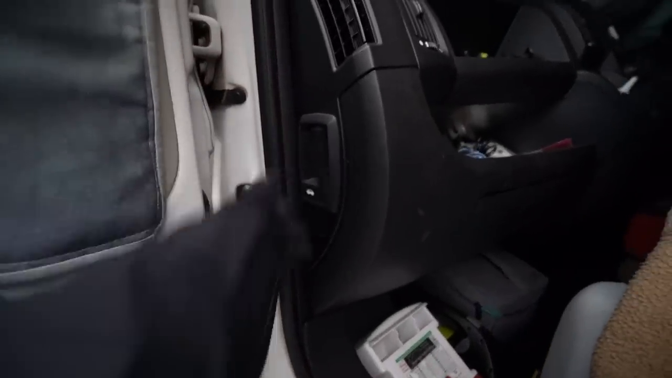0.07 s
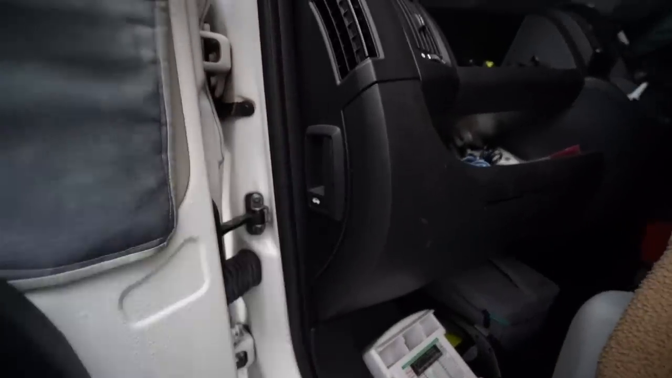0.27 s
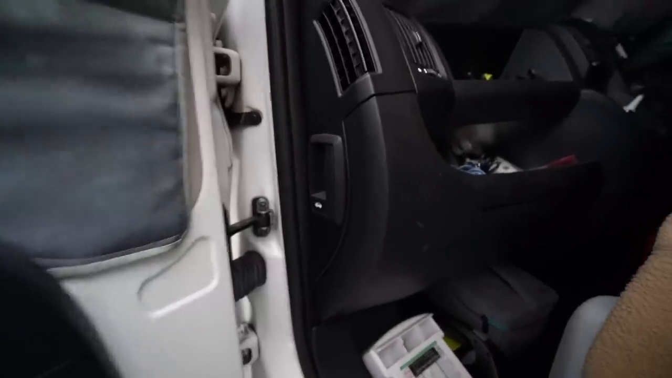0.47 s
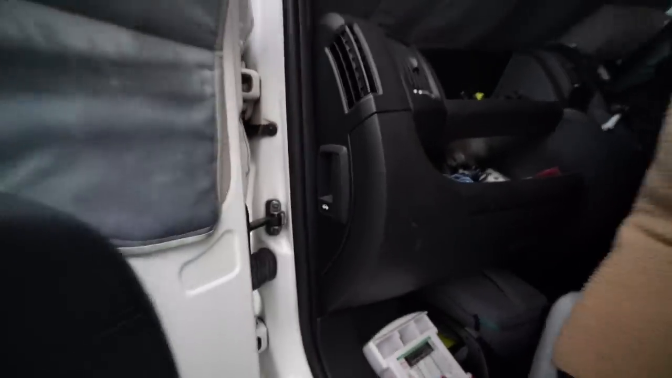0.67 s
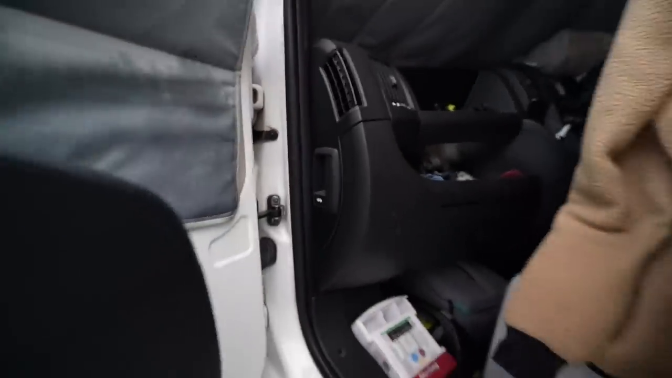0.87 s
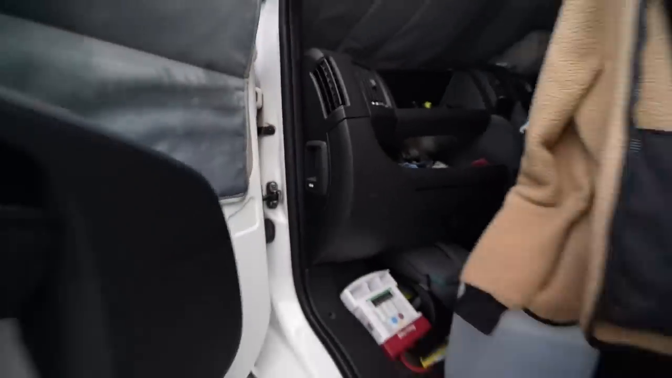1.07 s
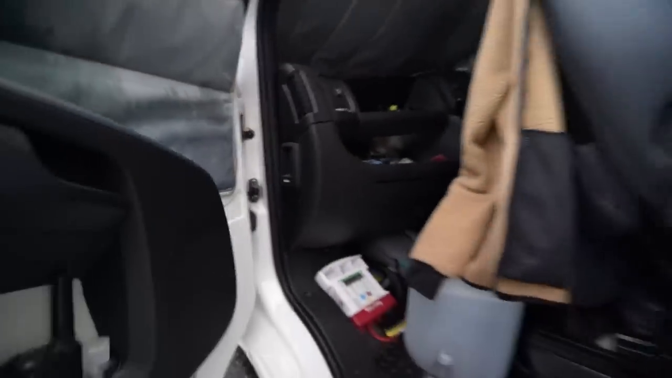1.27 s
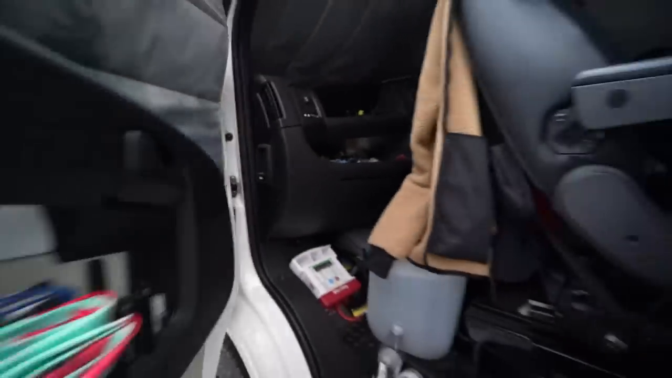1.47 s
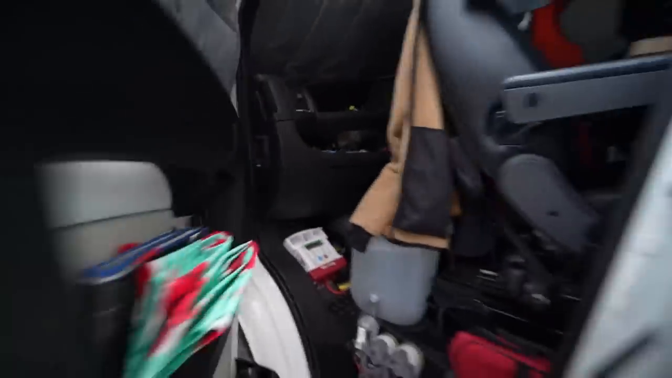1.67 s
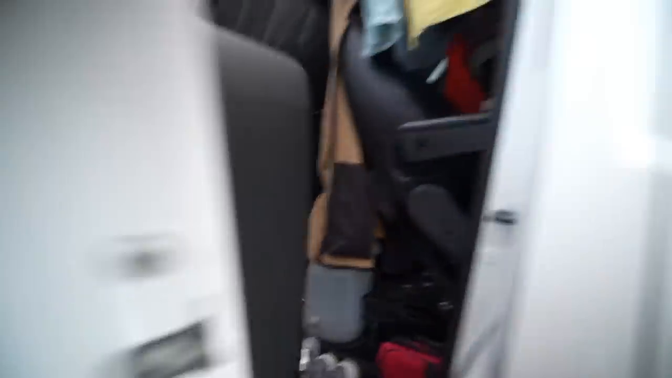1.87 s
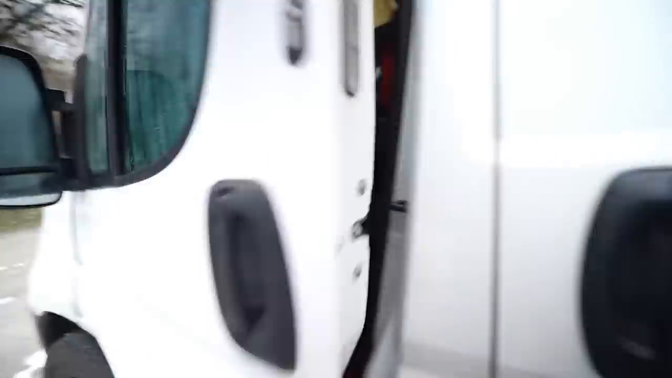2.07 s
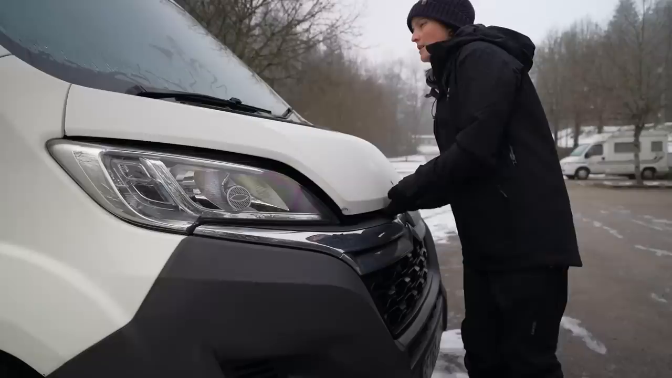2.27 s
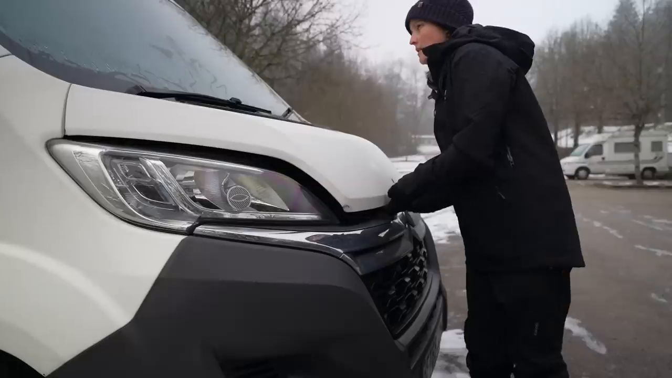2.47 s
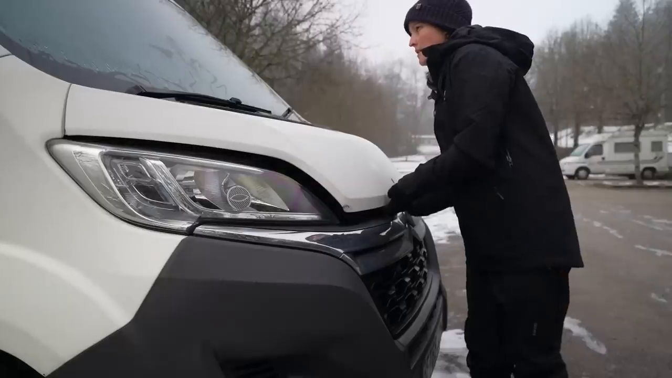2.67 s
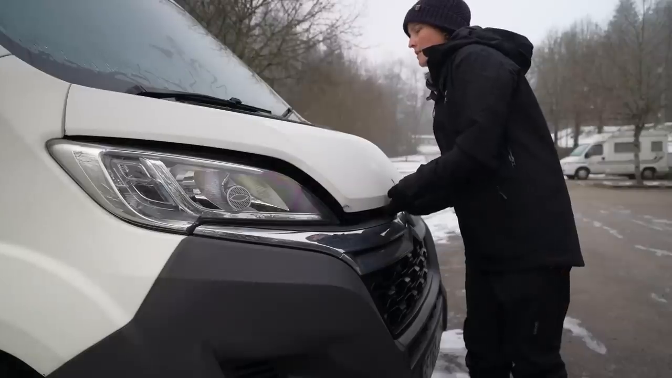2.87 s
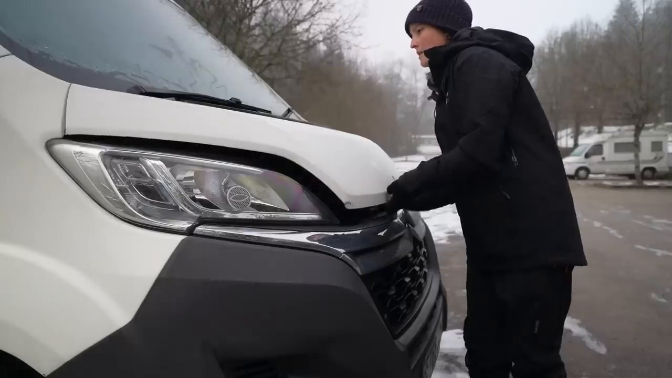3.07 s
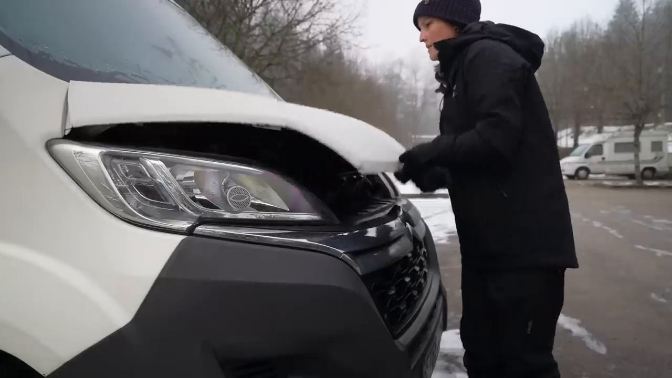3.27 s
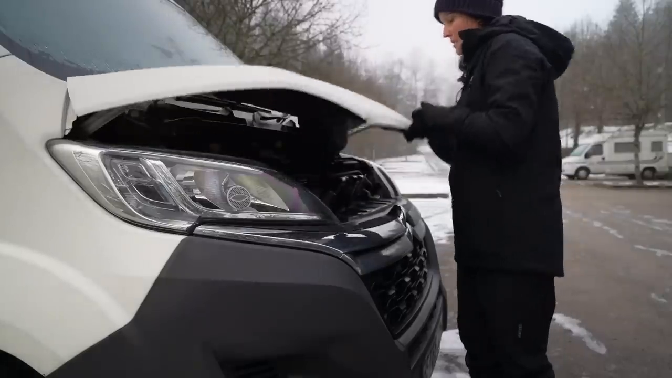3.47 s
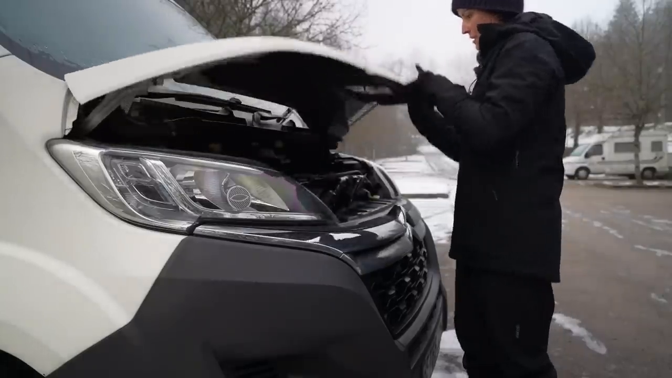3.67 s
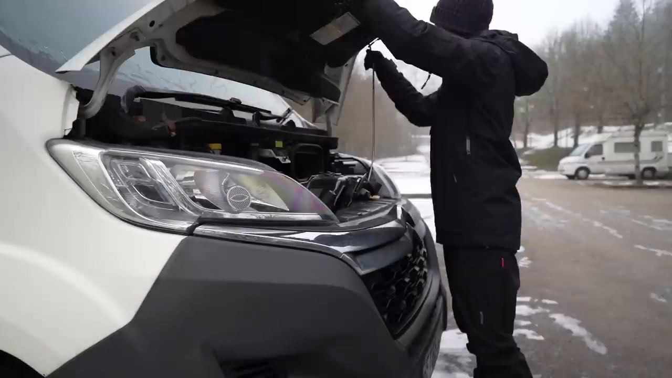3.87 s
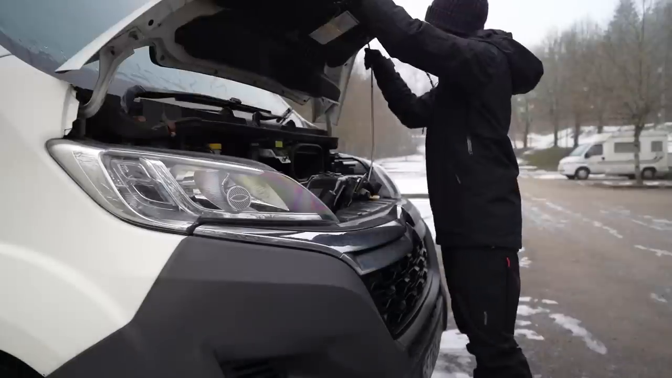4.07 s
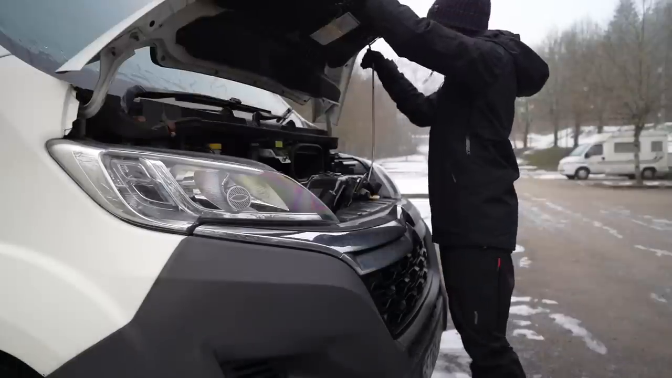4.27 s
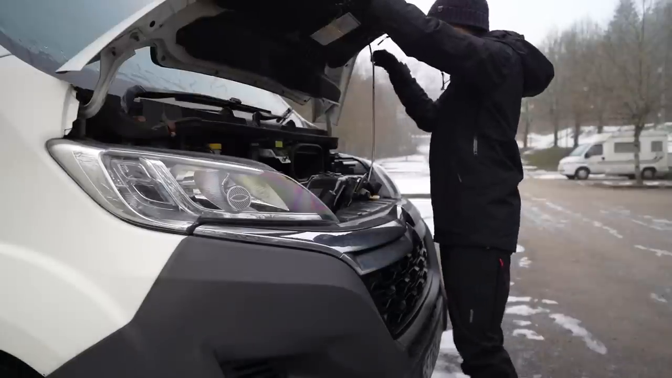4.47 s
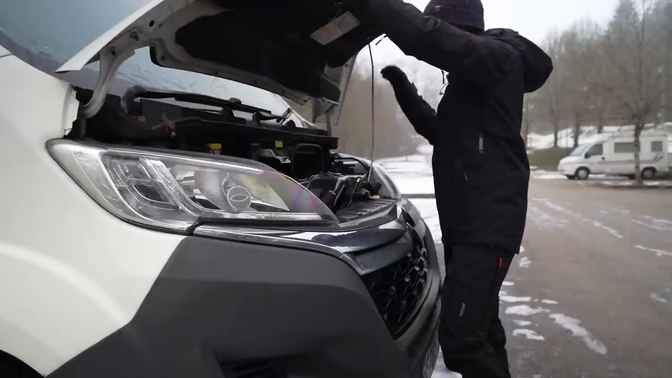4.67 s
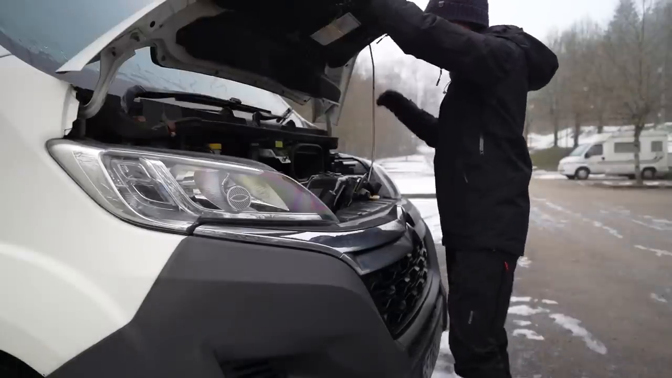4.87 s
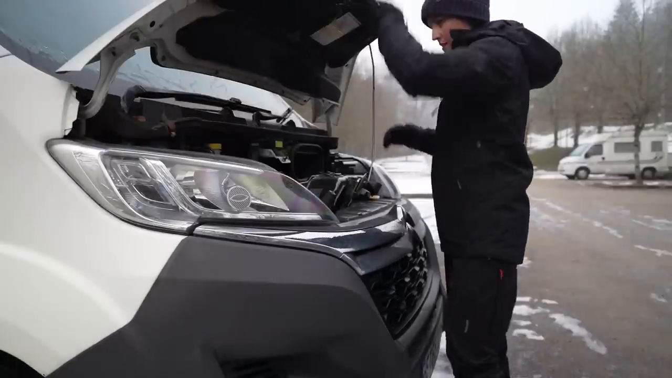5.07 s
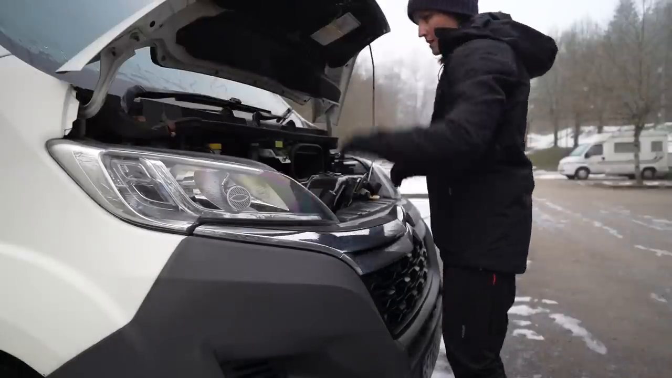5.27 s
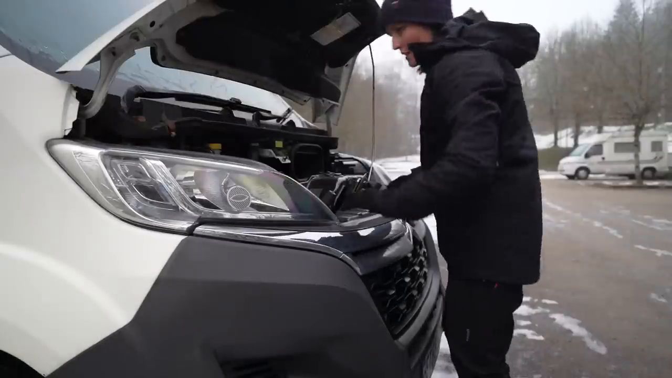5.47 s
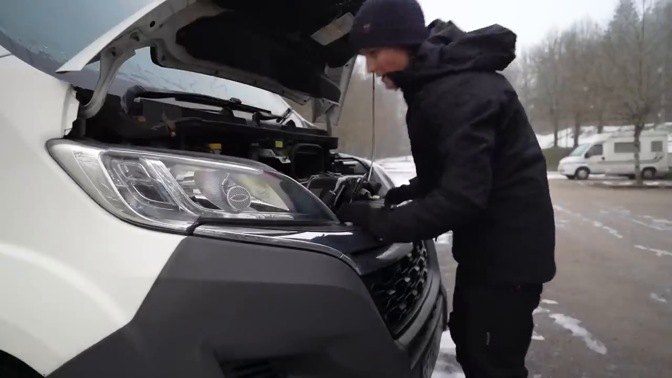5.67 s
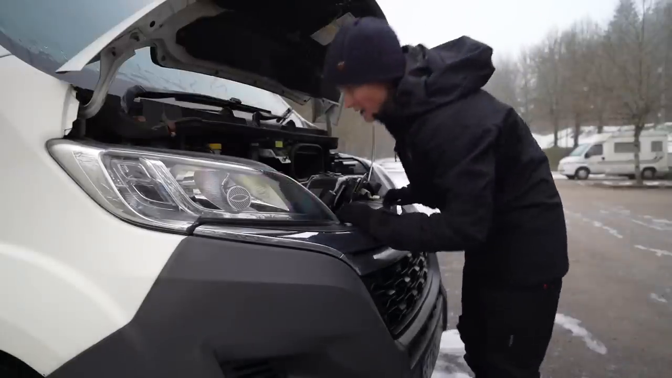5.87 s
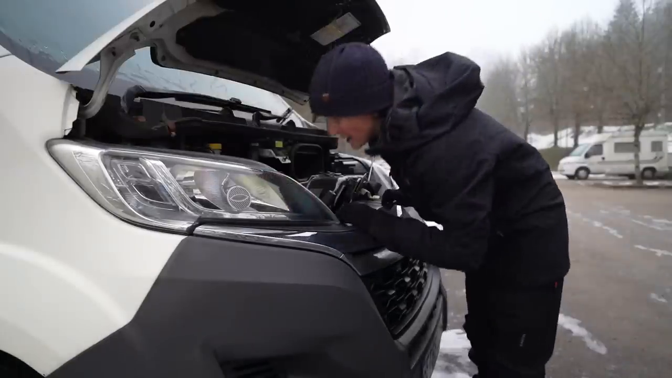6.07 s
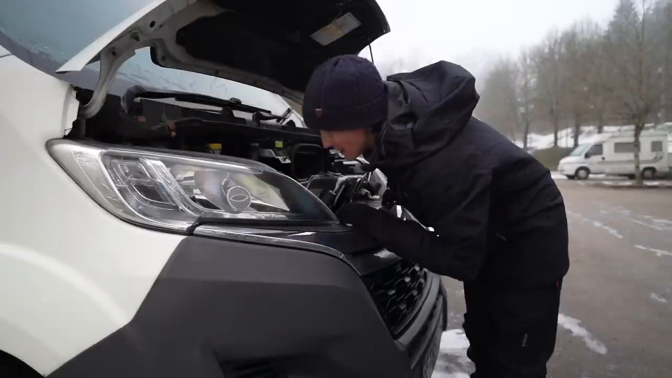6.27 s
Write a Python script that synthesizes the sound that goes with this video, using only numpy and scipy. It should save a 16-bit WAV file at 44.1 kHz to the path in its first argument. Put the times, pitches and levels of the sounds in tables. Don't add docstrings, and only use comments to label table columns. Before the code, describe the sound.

Outdoors by a van, close and hand-held at first, with low wind and grip rumble. At 0.1 s a sprung plastic lever snaps sharply, hits its stop and bounces within 0.05 s. A jacket sleeve whips past at 0.2-0.3, then trim scrapes and a knock at 0.39, gear sliding and bumping from 0.55 to 0.75. Soft low thumps and small ticks continue from 0.9 to 2.1. At 2.22-2.36 the heavy cab door slams, the loudest event, several dense dry impacts with a brief wash and loose rattles until 2.65. Steady quiet air with distant traffic follows. A steel catch clicks at 2.88; slips lead to a bright hollow bonnet clunk at 3.21, ringing sheet metal. Light cloth movement, then a prop rod knocks home at 4.06 and rings. Faint bird whistles at 4.44, 4.63 and 6.07. From 4.95 to 6.3, soft dull finger taps and tiny clicks in the engine bay, strongest around 5.02 and 5.74.

```python
import sys
import numpy as np
from scipy import signal
from scipy.fft import rfft, irfft
from scipy.io import wavfile

SR = 44100
rng = np.random.default_rng(int(sys.argv[2]) if len(sys.argv) > 2 else 0)


def bounce(signal):
    frames = np.transpose(np.atleast_2d(signal))
    limited = np.clip(frames, -1, 1)
    pcm = np.round(limited * 32767).astype(np.int16)
    wavfile.write(sys.argv[1], SR, pcm)


def gain_from_db(level_db):
    decades = np.asarray(level_db, float) / 20
    return 10 ** decades


N = 278267
EDGES_HZ = 24 * 2 ** np.arange(0, 9.6, 1 / 2)
CENTRES_HZ = np.sqrt(EDGES_HZ[1:] * EDGES_HZ[:-1])


def rms_one(x):
    return x / np.sqrt(np.mean(x ** 2, axis=-1, keepdims=True) + 1e-20)


def at_hz(points, hz):
    table_hz, value = np.transpose(points)
    return np.interp(np.log(hz), np.log(table_hz), value)


def band_pass(x, low_hz, high_hz):
    return signal.sosfilt(signal.butter(2, [low_hz, high_hz], "band", fs=SR, output="sos"), x)


def drift(rate_hz, count):
    r = np.exp(-2 * np.pi * rate_hz * 64 / SR)
    white = rng.standard_normal((count, N // 64 + 1002))
    slow = signal.lfilter([1], [1, -2 * r, r * r], white)[:, 1000:]
    return np.repeat(rms_one(slow), 64, axis=1)[:, :N]


def noise_bank():
    white = rng.standard_normal((2, N + SR))
    bands = zip(EDGES_HZ, EDGES_HZ[1:])
    return np.array([band_pass(white[k % 2], low, high) for k, (low, high) in enumerate(bands)])


def crackle(per_s, spread_db, clump_hz):
    sizes = gain_from_db(spread_db * np.minimum(rng.exponential(1, N), 5)) * rng.choice([-1, 1], N)
    chance = per_s * gain_from_db(4 * drift(clump_hz, count=1)[0]) / SR
    return rms_one(sizes * (rng.random(N) < chance))


def strokes(rows, attack_s, release_s):
    t = np.arange(0, N + 16, 16) / SR
    gain = 0
    for s, length_s, db, fall_db in rows:
        corners_s = [s - attack_s, s, s + length_s, s + length_s + release_s]
        corners_db = [db - 24.5, db, db - fall_db, db - fall_db - 34.5]
        gain = gain + gain_from_db(np.interp(t, corners_s, corners_db, -200, -200))
    return np.interp(np.arange(N) / SR, t, gain)


def blows(bank, events, modes, tone, t60s, modes_db, panel_db, crack_db, rise_cycles, contact_s):
    out, t = np.zeros(N + SR), np.arange(SR // 3) / SR
    hz, mode_db, mode_t60 = (c[:, None] for c in np.transpose(modes))
    signs = (-1) ** np.arange(len(modes))
    band_gain = gain_from_db(at_hz(tone, CENTRES_HZ))
    band_gain = band_gain / np.sqrt(np.sum(band_gain ** 2 * np.diff(EDGES_HZ)) / (SR / 2))
    press = 1 - np.exp(-t / max(contact_s, 1e-4))
    swell = 1 - np.exp(-t * CENTRES_HZ[:, None] / max(rise_cycles, .05))
    sines, band_t60 = np.sin(2 * np.pi * hz * t), at_hz(t60s, CENTRES_HZ)[:, None]
    longest_s = max(band_t60.max(), mode_t60.max())
    luck = rng.standard_normal((len(events), len(modes), 1))
    for (s, peak_db, bass_db, treble_db, length), strength in zip(events, luck):
        tilt = [(250, bass_db), (900, 0.0091), (4000, treble_db)]
        at, length = round(s * SR), np.clip(length, .2, 3)
        n = min(len(t), int(2 * length * longest_s * SR))
        fall = np.log(1000) * t[:n] / length
        dying = np.exp(-fall / band_t60) + gain_from_db(-24.5) * np.exp(-0.31 * fall / band_t60)
        noise = bank[:, at:at + n]
        panel = (band_gain * gain_from_db(at_hz(tilt, CENTRES_HZ))) @ (swell[:, :n] * dying * noise)
        rings = gain_from_db(mode_db + at_hz(tilt, hz) + 1.1 * strength) * np.exp(-fall / mode_t60) * sines[:, :n]
        crack = gain_from_db(crack_db + treble_db - 60 * t[:n] / 0.0028) * np.sum(noise[-4:], axis=0)
        body = gain_from_db(panel_db) * panel + gain_from_db(modes_db) * (signs @ rings)
        out[at:at + n] += gain_from_db(peak_db) * (press[:n] * body + crack)
    low_cut = signal.butter(2, tone[1][0] * 1.3, "high", fs=SR, output="sos")
    return signal.sosfilt(low_cut, out[:N] + 1e-12)


# (frequency [Hz], density [dB/Hz])
AIR_TONE = [(22, -25), (103, 2.5), (266, 5), (980, 0), (2670, -8), (4360, -27.5), (14000, -29.5),
            (16500, -46.5)]
# (time [s], length [s], level [dB], fall [dB])
SLAM_WASH = [
    (2.4, 0.17, -50, 16),
]
AIR_DB, AIR_FOLLOWS = -64.5, .35


def far_air(bank, rustle):
    gains = gain_from_db(at_hz(AIR_TONE, CENTRES_HZ)[:, None] + 1.4 * drift(8, count=len(bank)))
    air = np.sum(gains * bank[:, SR:], axis=0)
    level = gain_from_db(AIR_DB) * (rustle / gain_from_db(-78.5)) ** AIR_FOLLOWS
    level = level + strokes(SLAM_WASH, attack_s=.1, release_s=0.046)
    return level * air / np.std(band_pass(air, 280, 3500))


# (time [s], frequency [Hz], level [dB])
CHIRPS = [
    (4.44, 4690, -66.5),
    (4.631, 4500, -69),
    (6.073, 6000, -69.5),
]
CHIRP_S = 0.015


def bird():
    out, t = np.zeros(N), np.arange(N) / SR
    for s, hz, db in CHIRPS:
        shape = np.exp(-((t - s - CHIRP_S / 2) / (0.43 * CHIRP_S)) ** 2)
        out += gain_from_db(db) * shape * np.sin(2 * np.pi * hz * (t - s) * (1 - 2.5 * (t - s)))
    return out


# (time [s], rumble level [dB])
GRIP = [(0, -65), (.3, -80), (.62, -81), (.7, -68), (.89, -76), (1.0, -68), (1.75, -56.5), (2.15, -65.5),
        (2.28, -46), (2.42, -62), (2.75, -73.5)]
BOOM_DB, BOOM_FOLLOWS = -56, 0.55


def hand_held():
    grip_s, grip_db = np.transpose(GRIP)
    t = np.arange(N) / SR
    rumble_db = np.interp(t, grip_s, grip_db)
    boom_db = BOOM_DB + BOOM_FOLLOWS * (rumble_db + 59.5)
    lumps = gain_from_db(4 * drift(15, count=2))
    rumble = rms_one(lumps[0] * band_pass(rng.standard_normal(N), 27, 59))
    boom = rms_one(lumps[1] * band_pass(band_pass(rng.standard_normal(N), 53, 280), 110, 320))
    return (gain_from_db(rumble_db) * rumble + gain_from_db(boom_db) * boom) * (t < grip_s[-1])


# (time [s], length [s], level [dB], fall [dB])
CLOTH = [(.06, 0.48, -50.5, 15.5), (.66, 0.18, -58, 5.5), (.94, 0.038, -63.5, -0.5), (1.1, 0.39, -80.5, -8),
         (1.55, 0.54, -77.5, 12), (2.3, 0.3, -76, -7.5), (2.8, 0.15, -84.5, 7.5), (3.15, 0.59, -68.5, 8.5),
         (4.3, 0.39, -85.5, -4.5), (4.96, 0.52, -73.5, -4), (5.5, 0.3, -75.5, 3), (5.85, 0.37, -76.5, 7)]
STILL_DB = -81.5


def jacket_motion():
    return gain_from_db(STILL_DB) + strokes(CLOTH, attack_s=0.1, release_s=0.094)


# (frequency [Hz], level [dB])
CLOTH_TONE = [(700, -25.5), (2000, -1), (3000, 0), (5000, -4), (8000, -7.5), (12000, -12.5), (15500, -10),
              (16500, -30)]
# (time [s], length [s], level [dB], fall [dB])
SWISH = [
    (.17, 0.14, -38, 17.5),
    (.77, .06, -58, 1),
    (.955, .02, -62, 0),
]


def cloth(rustle):
    rubbing = rfft(crackle(2500, spread_db=3.0, clump_hz=25.02) + 1.1 * rng.standard_normal(N))
    rubbing = irfft(rubbing * gain_from_db(at_hz(CLOTH_TONE, np.arange(len(rubbing)) * SR / N + 1)), N)
    rubbing = rustle * rubbing / np.std(band_pass(rubbing, 4400, 15000))
    uneven = rng.standard_normal(N) * gain_from_db(0.95 * drift(60, count=1)[0])
    swish = rms_one(band_pass(band_pass(uneven, 2100, 4800), 1600, 8000))
    return rubbing + strokes(SWISH, attack_s=0.095, release_s=0.069) * swish


# (time [s], length [s], level [dB], fall [dB])
GRATE = [
    (.325, 0.046, -37.5, 1),
    (.39, 0.087, -58, -10.5),
    (.58, 0.19, -42, 10),
    (.95, .02, -54, 5),
    (1.42, 0.091, -57.5, -5),
    (1.84, 0.075, -50, 5),
]
# (frequency [Hz], width [Hz], level [dB])
TRIM_MODES = [(480, 127, 1.5), (900, 110, 2.5), (1284, 330, -2.5), (2110, 1050, -9.5), (3300, 410, -11)]


def grate():
    slips = crackle(700, spread_db=4.0, clump_hz=47.7) + 1e-18
    rings = sum(gain_from_db(db) * band_pass(slips, hz - width / 2, hz + width / 2) for hz, width, db in TRIM_MODES)
    return gain_from_db(-4.0) * strokes(GRATE, attack_s=0.054, release_s=0.088) * rms_one(rings)


# (time [s], peak level [dB], frequency [Hz])
THUMPS = [(.69, -39, 146), (0.933, -37, 209), (.86, -47.5, 140), (1.027, -41.5, 150), (1.062, -43, 141),
          (1.145, -49, 150), (1.335, -46, 180), (1.485, -47, 130), (1.75, -44.5, 200), (1.795, -42.5, 200),
          (1.83, -42, 200), (1.226, -31.5, 242), (1.249, -30.5, 246), (1.283, -35.5, 219),
          (1.398, -41, 137), (1.46, -39, 293), (1.575, -41.5, 130), (1.614, -37.5, 138), (1.696, -36, 143),
          (1.873, -35, 382), (2.06, -43.5, 144.5), (2.108, -44, 129), (3.457, -41, 159)]
THUMP_CYCLES = 19


def thumps():
    out, t = np.zeros(N + SR), np.arange(SR // 3) / SR
    for s, peak_db, hz in THUMPS:
        shape = gain_from_db(peak_db + 0.5 - 60 * t * hz / THUMP_CYCLES) * (1 - np.exp(-t / 0.0018))
        pair = np.sin(2 * np.pi * hz * t) + 0.5 * np.sin(2 * np.pi * 1.45 * hz * t)
        out[round(s * SR):][:len(t)] += shape * pair
    return out[:N]


# (time [s], peak level [dB], centre frequency [Hz], t60 [s])
TICKS = [(.312, -35, 2800, .03), (.324, -34, 1000, .04), (.333, -36, 1500, .04), (.341, -32, 1200, .05),
         (0.349, -37, 900, .05), (.372, -36, 1300, .04), (.437, -42, 700, .05), (.478, -44, 900, 0.045),
         (.541, -45, 1500, .03), (.636, -41, 1500, .05), (.765, -44, 700, .03), (.859, -42, 700, .03),
         (.915, -43, 2500, .02), (.939, -50, 4000, .03), (.975, -41, 4000, .03), (.99, -50, 1200, 0.035),
         (1.062, -49.5, 2200, 0.034), (1.136, -48, 2500, 0.023), (1.147, -50, 600, 0.046),
         (1.163, -52, 1800, .03), (1.277, -52, 3300, .015), (1.296, -52, 2800, .04), (1.405, -49, 700, .04),
         (1.46, -50, 1000, .04), (1.483, -47, 900, .04), (1.505, -50, 900, .03), (1.517, -49, 900, .03),
         (1.607, -54, 3500, .015), (1.658, -53, 3000, .02), (1.696, -52, 1200, .03),
         (1.712, -53, 3500, .02), (1.794, -48, 3300, .02), (1.829, -48, 2500, .025),
         (1.848, -49, 2000, .025), (1.899, -49, 1200, .03), (1.932, -53, 3000, .03),
         (1.997, -53, 2500, 0.021), (2.018, -54.5, 5000, .02), (2.078, -55, 1500, .02),
         (2.105, -55, 3000, .03), (2.173, -52, 2500, .02), (2.183, -52, 1500, .03), (2.21, -45, 1000, .06)]
CHATTER = [(2.229, -16, 1500, 0.036), (2.243, -35.5, 12000, .04), (2.248, -36, 12950, 0.028),
           (2.257, -36, 7020, .015), (2.262, -38, 9990, .02), (2.272, -34.5, 6536, .05),
           (2.281, -43.5, 11040, 0.054), (2.299, -38.5, 8030, .02), (2.306, -42, 11000, .02),
           (2.318, -30, 6500, 0.027), (2.319, -41, 11900, 0.027), (2.361, -41, 6000, 0.034),
           (2.376, -55, 8000, .02)]
CLICKS = [(4.195, -56, 2500, 0.033), (4.385, -59.5, 2500, .04), (4.949, -54, 6030, .015),
          (4.977, -50.5, 3500, .02), (5.025, -50, 8000, .015), (5.038, -48.5, 2500, .02),
          (5.054, -43.5, 1200, 0.032), (5.072, -49.5, 2000, .04), (5.096, -60, 11000, .015),
          (5.216, -52, 900, .03), (5.243, -59, 11000, .015), (5.296, -51, 700, .03),
          (5.355, -59, 8000, .015), (5.449, -59, 7000, .015), (5.483, -62, 13000, .015),
          (5.585, -59, 8000, .02), (5.69, -63, 12000, .015), (5.751, -45.5, 2500, 0.053),
          (5.775, -55, 2500, .02), (5.847, -59, 9000, .015), (5.87, -51.5, 700, 0.033)]
TICK_OCTAVES = .55


def ticks(bank):
    out, t = np.zeros(N + SR), np.arange(SR // 10) / SR
    for s, peak_db, hz, t60 in TICKS + CHATTER + CLICKS:
        at = round(s * SR)
        weights = np.exp(-(np.log2(CENTRES_HZ / hz) / TICK_OCTAVES) ** 2)
        puff = rms_one(weights @ bank[:, at + SR // 2:][:, :len(t)])
        shape = gain_from_db(peak_db - 3 - 60 * t / max(t60, .005)) * (1 - np.exp(-t / 0.00062))
        out[at:at + len(t)] += shape * puff
    return out[:N]


# (time [s], peak level [dB], treble [dB])
TAPS = [(3.803, -46, -2.5), (3.87, -47, -3), (4.2, -46, -5), (4.952, -49.5, 9), (4.988, -35, 2),
        (5.024, -23, -37.5), (5.037, -46, 6.5), (5.14, -31, -9), (5.281, -31, -8.5), (5.408, -30.5, -5.2),
        (5.576, -37.5, -11), (5.74, -26, -10), (5.827, -36.5, -7.5), (5.958, -35, -21), (6.285, -34, -15)]
# (frequency [Hz], level [dB], t60 [s])
BAY_MODES = [(663, -5, 0.049), (882, 0.5, 0.035)]
# (frequency [Hz], density [dB/Hz])
TAP_TONE = [(59, -30), (100, -30.5), (2170, 0.5), (3540, -10), (4030, -8.5), (15100, -25.5), (16500, -40)]
# (frequency [Hz], t60 [s])
SMALL_T60 = [(100, 0.081), (400, 0.079), (1500, 0.068), (5000, 0.062), (15000, 0.054)]
TAP_BASS_DB, TAP_RING = 13.5, 0.69


def finger_taps(bank):
    events = [(s, db, TAP_BASS_DB, treble_db, TAP_RING) for s, db, treble_db in TAPS]
    return blows(bank, events, BAY_MODES, TAP_TONE, SMALL_T60, modes_db=-15.5, panel_db=-8.5,
                 crack_db=-34, rise_cycles=0.43, contact_s=0.00049)


# (time [s], peak level [dB], treble [dB], ring length [factor])
SHUFFLE = [(0.314, -34, -1, 3.3), (0.385, -14.5, -9.5, 0.37), (0.393, -42, 22, 0.47),
           (0.417, -29, -6, 0.75), (0.542, -42, 6, 0.42), (0.578, -31, 3, 0.41), (0.59, -23.5, -2, 0.51),
           (0.612, -24, 6, 0.33), (0.676, -34.5, 9, 0.77), (0.684, -25.5, 2.5, 0.56),
           (0.704, -26, -1, 0.65), (0.762, -37, -10, 0.41), (0.975, -37, 0, 0.53), (1.577, -26.5, -7, 0.31),
           (1.795, -27.5, -15, 0.35), (1.873, -29.5, 2, 0.46), (1.922, -30.5, -22, 0.6),
           (2.172, -40.5, -26, 4.9)]
# (frequency [Hz], level [dB], t60 [s])
CAB_MODES = [(450.3, 1.1, 0.052), (846, -1.5, 0.042)]
# (frequency [Hz], density [dB/Hz])
SHUFFLE_TONE = [(35, -28), (60, -5.5), (464, -4), (659, -5), (3040, -7.5), (13000, -36.5), (16500, -47)]
SHUFFLE_BASS_DB = 1.5


def shuffle(bank):
    events = [(s, db, SHUFFLE_BASS_DB, treble_db, length) for s, db, treble_db, length in SHUFFLE]
    return blows(bank, events, CAB_MODES, SHUFFLE_TONE, SMALL_T60, modes_db=-13.5, panel_db=-3.5,
                 crack_db=-23.0, rise_cycles=2.6, contact_s=0.0032)


# (time [s], peak level [dB], treble [dB], ring length [factor])
RATTLE = [
    (2.474, -30.5, 14, 1.2),
    (2.522, -23, -0.5, 0.96),
    (2.538, -30.5, -39, 1.7),
    (2.568, -25.5, -7, 1.55),
    (2.632, -42.5, -10, 0.66),
    (2.668, -52, 11, 0.77),
]
# (frequency [Hz], density [dB/Hz])
RATTLE_TONE = [(35, -40), (60, -30), (234, 3), (573, -3), (1010, -2), (1130, -5.5), (13700, -49.5),
               (16500, -53.5)]


def rattle(bank):
    events = [(s, db, SHUFFLE_BASS_DB, treble_db, length) for s, db, treble_db, length in RATTLE]
    return blows(bank, events, CAB_MODES, RATTLE_TONE, SMALL_T60, modes_db=-17.0, panel_db=-7.0,
                 crack_db=-23.0, rise_cycles=1.0, contact_s=0.00046)


# (time [s], peak level [dB], frequency [Hz], t60 [s])
KNOCKS = [(.1035, -5, 560, 0.014), (0.1203, -8.5, 560, 0.019), (.1026, -24, 14400, .012),
          (.1195, -35, 14400, .01), (4.062, -19, 2490, .06), (4.064, -21, 458, 0.094),
          (4.074, -30, 340, .15), (.1026, -14, 2400, .012), (.1198, -16, 1800, .014),
          (.132, -19, 1900, .016), (.1405, -21, 1900, .016), (.147, -26, 1900, .016), (.324, -39, 890, .03),
          (.341, -37, 885, .04), (.3405, -38, 2000, .02), (.35, -40, 890, .04), (.332, -37, 480, .05),
          (.312, -40, 2790, .015), (.387, -33, 1250, .02), (2.2225, -12, 1600, .02),
          (2.2465, -8, 520, .015), (2.883, -38, 3300, .015), (3.212, -24, 360, .25), (3.208, -23, 950, .06),
          (3.156, -38, 2600, .04), (5.41, -46, 200, .05), (5.742, -46, 4300, .02), (1.228, -40, 140, .12),
          (4.062, -22.5, 1900, .06), (4.062, -22.5, 2980, 0.052), (2.2385, 6, 450, 0.0033),
          (2.2671, 14, 480, 0.0026), (2.3139, -5.5, 508, 0.015), (2.355, -16.5, 330, 0.018),
          (5.142, -42, 2490, 0.018), (6.058, -49.5, 910, 0.017), (6.208, -43, 460, 0.02),
          (0.387, -27.5, 515, 0.033), (1.578, -45.5, 3460, 0.018)]


def knocks():
    out, t = np.zeros(N + SR), np.arange(SR // 10) / SR
    for s, peak_db, hz, t60 in KNOCKS:
        shape = gain_from_db(peak_db + 4.5 - 60 * t / max(t60, .004)) * (1 - np.exp(-t * hz * 4))
        out[round(s * SR):][:len(t)] += shape * np.sin(2 * np.pi * hz * t)
    return band_pass(out[:N], 140, 16000)


# (time [s], peak level [dB], bass [dB], treble [dB], ring length [factor])
CATCH = [
    (2.8825, -21, 11.5, 9.5, 0.32),
    (2.8851, -18.5, 8.5, 8, 1),
    (2.900, -17, -8.5, -19, 0.7),
]
# (frequency [Hz], level [dB], t60 [s])
CATCH_MODES = [(256.3, -15, 0.3), (472, -3.5, 0.084), (1006, -11, 0.082), (1117.6, 3.5, 0.11),
               (1270, 8, 0.032), (3227, -12.5, 0.037)]
# (frequency [Hz], density [dB/Hz])
CATCH_TONE = [(35, -45.5), (60, -7.5), (796, -1), (1160, -4.5), (1850, -6.5), (12400, -39.5), (16500, -57)]
# (frequency [Hz], t60 [s])
SHEET_T60 = [(100, 0.42), (300, 0.2), (1000, 0.12), (3000, 0.06), (8000, 0.049), (15000, 0.027)]


def safety_catch(bank):
    return blows(bank, CATCH, CATCH_MODES, CATCH_TONE, SHEET_T60, modes_db=-7.5, panel_db=-16.5,
                 crack_db=-21.5, rise_cycles=1.7, contact_s=0.0013)


# (time [s], peak level [dB], bass [dB], treble [dB], ring length [factor])
PROP = [
    (4.038, -34, 7, -13, 1),
    (4.060, -16, -6, 7, 0.91),
    (4.064, -5.5, 0.5, 7.5, 0.88),
    (4.068, -17, 3, 9.5, 0.29),
    (4.074, -25, 4.5, -23.5, 0.31),
]
# (frequency [Hz], level [dB], t60 [s])
PROP_MODES = [(463, -9, 0.1), (537, -10, 0.11), (613, 0, 0.12), (717, -8.5, 0.33), (970, -7, 0.19),
              (1029, -5, 0.092), (1450, -8, 0.19), (1735, -12.5, 0.17), (2200, -8.5, 0.08)]
# (frequency [Hz], density [dB/Hz])
PROP_TONE = [(35, -55), (110, -12), (432, -2), (1540, -8), (2460, -7.5), (8150, -31), (14300, -51.5),
             (16500, -70)]


def prop_rod(bank):
    return blows(bank, PROP, PROP_MODES, PROP_TONE, SHEET_T60, modes_db=-17.5, panel_db=-10.5,
                 crack_db=-31, rise_cycles=1.53, contact_s=0.0015)


# (time [s], peak level [dB], bass [dB], treble [dB], ring length [factor])
BONNET = [
    (2.801, -31, -10, -10, 0.69),
    (3.06, -35, -25.5, 5, 0.25),
    (3.098, -30.5, -2.5, -7.5, 0.98),
    (3.109, -30.5, 6.5, 2, 0.52),
    (3.131, -32.5, 9, 4.5, 0.76),
    (3.154, -24.5, -2, 8, 1),
    (3.199, -28, 5, 0.5, 1),
    (3.207, -6, -28, 3, 0.82),
    (3.218, -20.5, 11.5, 3, 1),
]
# (frequency [Hz], level [dB], t60 [s])
BONNET_MODES = [(234, -1, .2), (276.4, -11, 0.45), (381.7, 4, 0.17), (455, -18, 0.12), (619, 2, 0.17),
                (1010, -3, 0.056), (1180, -12, 0.11), (1494, 0.5, 0.052), (2610, -5.5, 0.059)]
# (frequency [Hz], density [dB/Hz])
BONNET_TONE = [(35, -57.5), (60, -28), (375, 6), (629, -9), (938, -2), (7780, -30), (16500, -54)]


def bonnet(bank):
    return blows(bank, BONNET, BONNET_MODES, BONNET_TONE, SHEET_T60, modes_db=-16.5, panel_db=-8.5,
                 crack_db=-25.5, rise_cycles=0.94, contact_s=0.00091)


# (time [s], peak level [dB], bass [dB], treble [dB])
LEVER = [
    (0.1024, -3.5, 2.5, 8),
    (0.1193, -1.5, 0, 0),
    (0.1315, -6.5, -4, 2.5),
    (.140, -12, 3.5, -2.5),
    (0.1465, -18.5, 7.5, 1),
]
# (frequency [Hz], level [dB], t60 [s])
LEVER_MODES = [(294, -6.5, 0.11), (351.3, -7, 0.12), (576, -6, 0.06), (515, -8, 0.12), (1272, -8.5, 0.041),
               (1674, -5, 0.028), (2000, -6, 0.039), (2433, -2.5, 0.03), (7715, -9.5, 0.01)]
# (frequency [Hz], density [dB/Hz])
LEVER_TONE = [(35, -66), (110, -29.5), (290, -2.5), (573, -5.5), (1010, -20), (1690, -12), (7600, -32),
              (16500, -47.5)]
# (frequency [Hz], t60 [s])
PLASTIC_T60 = [(100, 0.098), (400, 0.057), (1500, 0.052), (5000, 0.03), (15000, 0.042)]


def release_lever(bank):
    return blows(bank, [(*blow, 1) for blow in LEVER], LEVER_MODES, LEVER_TONE, PLASTIC_T60, modes_db=-8.5,
                 panel_db=-12.5, crack_db=-22.5, rise_cycles=0.82, contact_s=0.00012)


# (time [s], peak level [dB], bass [dB], treble [dB], ring length [factor])
DOOR = [(2.222, 1, -8, -9, 1.36), (2.227, -11, -4, -14, 4), (2.239, 0.5, -7.5, 3.5, 0.59),
        (2.247, -8.5, -1, -5, 2.8), (2.2668, -2.5, -15.5, 10.5, 0.52), (2.283, -8, 3, -5, 1.5),
        (2.298, -16.5, -9, 4, 1.26), (2.3133, -2, 0.5, 5.5, 0.48), (2.321, -8.5, -1, 3.5, 0.64),
        (2.35, -26.5, -2, 16.5, 1.14), (2.354, -20, 1, -9, 2.05), (2.361, -32, -6, 11, 0.5)]
# (frequency [Hz], level [dB], t60 [s])
DOOR_MODES = [(130, -15, 0.21), (239, -8, 0.03), (325, -4.5, 0.078), (554, 0.5, 0.011), (1140, -8, 0.028),
              (1666, -3.5, 0.012), (2500, -15.5, 0.023)]
# (frequency [Hz], density [dB/Hz])
DOOR_TONE = [(18, -18), (30, -8), (70, -22), (171, 6.5), (480, -3), (6050, -31), (13400, -40.5),
             (16500, -61.5)]
# (frequency [Hz], t60 [s])
DOOR_T60 = [(40, 0.33), (150, 0.084), (500, 0.092), (2000, 0.081), (8000, 0.044), (15000, 0.018)]


def door_slam(bank):
    return blows(bank, DOOR, DOOR_MODES, DOOR_TONE, DOOR_T60, modes_db=-4.0, panel_db=-12,
                 crack_db=-34.0, rise_cycles=.6, contact_s=0.00041)


def scene():
    bank = noise_bank()
    rustle = jacket_motion()
    background = far_air(bank, rustle) + bird() + hand_held()
    person = cloth(rustle) + grate() + thumps() + ticks(bank) + finger_taps(bank) + shuffle(bank)
    van = rattle(bank) + knocks() + safety_catch(bank) + prop_rod(bank) + bonnet(bank)
    van += release_lever(bank) + door_slam(bank)
    return (background + person + van)[None]


def band_limit(x):
    return signal.sosfilt(signal.butter(12, 16840, fs=SR, output="sos"), x)


def record(dry):
    limit = .84
    flattened = dry / (1 + np.abs(dry / limit) ** 6) ** (1 / 6)
    top_cut = signal.cheby2(10, 40, 16200, fs=SR, output="sos")
    return band_limit(signal.sosfilt(top_cut, flattened))


dry = scene()
out = record(dry)
bounce(out)
```